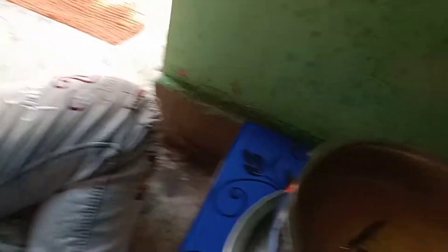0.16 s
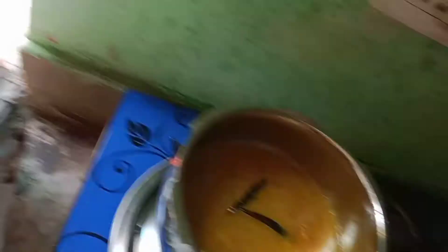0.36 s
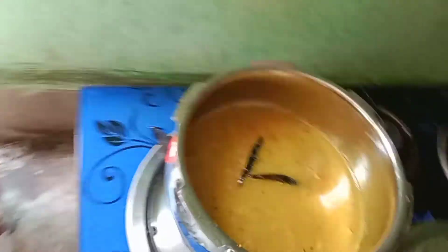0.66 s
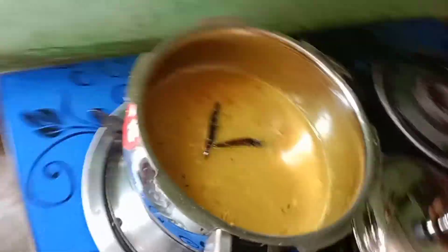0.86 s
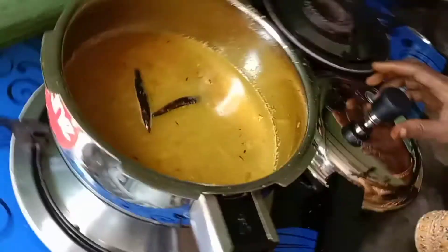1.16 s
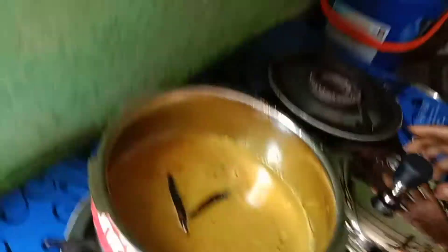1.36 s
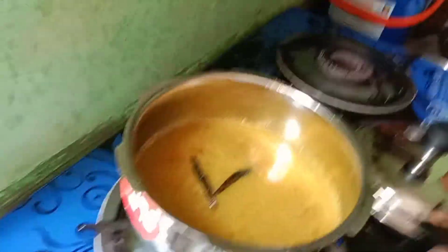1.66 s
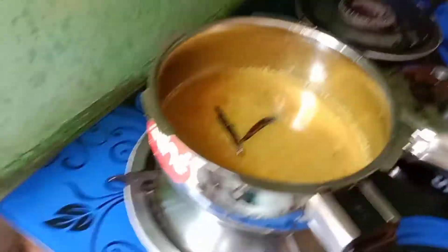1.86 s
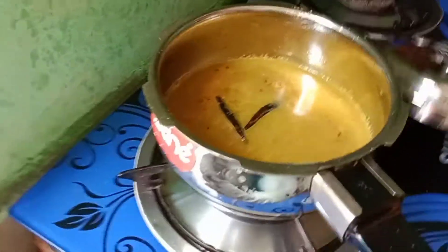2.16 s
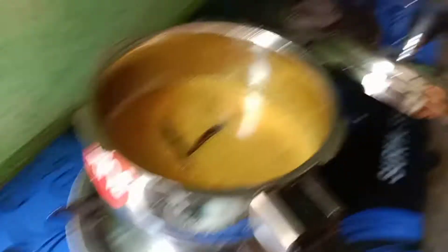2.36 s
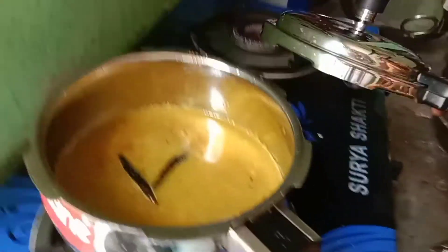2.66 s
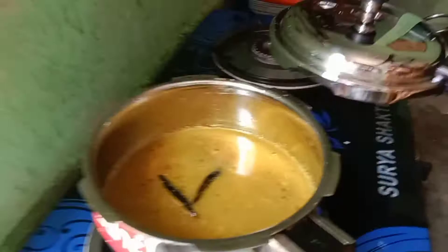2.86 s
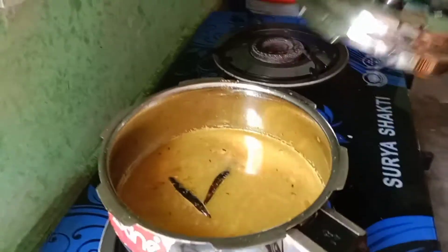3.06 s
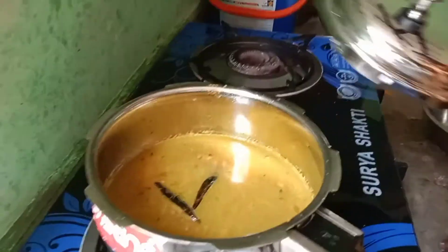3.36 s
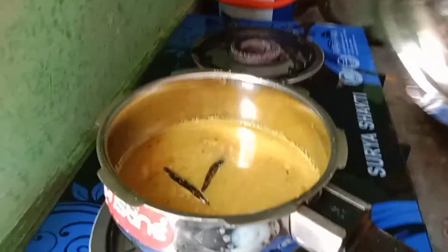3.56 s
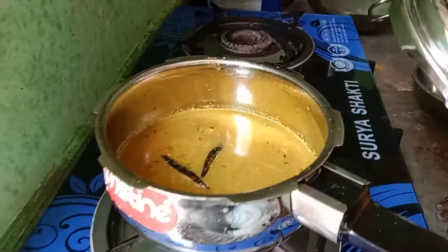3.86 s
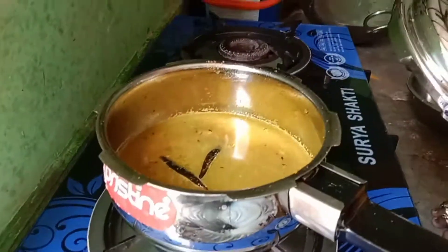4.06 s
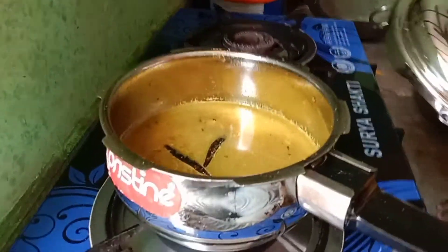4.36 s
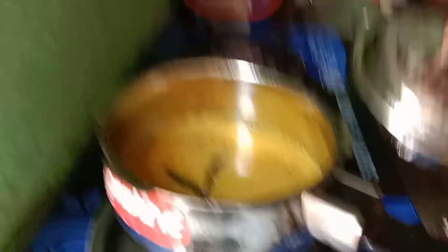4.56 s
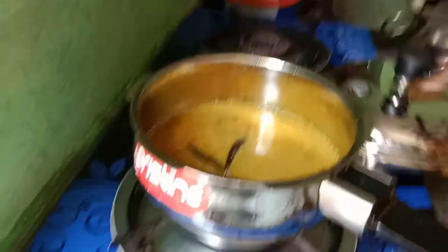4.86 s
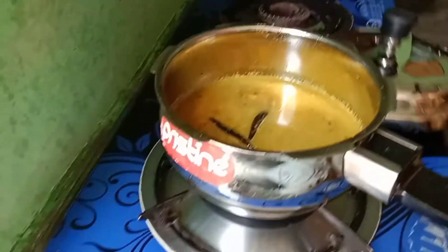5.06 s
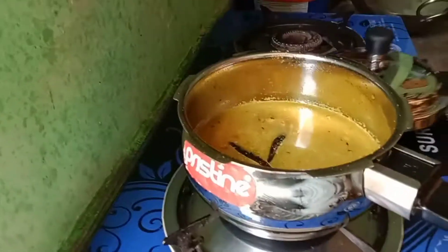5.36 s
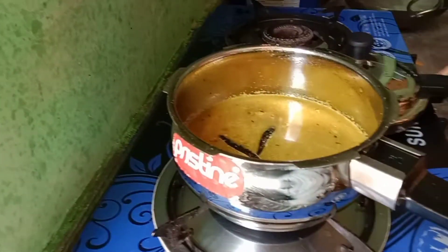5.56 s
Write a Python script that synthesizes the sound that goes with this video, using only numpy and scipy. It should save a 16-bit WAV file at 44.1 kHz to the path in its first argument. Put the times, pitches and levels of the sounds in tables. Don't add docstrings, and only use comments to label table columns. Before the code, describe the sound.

A metal cooker lid knocks, scrapes and clinks on a stove in a small kitchen while a vehicle horn buzzes briefly outside.

```python
import sys
import numpy as np
from scipy import signal
from scipy.io import wavfile
from scipy.ndimage import uniform_filter1d

SR = 44100
rng = np.random.default_rng(int(sys.argv[2]) if len(sys.argv) > 2 else 0)


def ratio_of_db(decibels):
    return 10 ** (np.asarray(decibels, float) / 20)


def generate_wav(signal):
    frames = np.transpose(np.atleast_2d(signal))
    scaled = np.clip(frames, -1, 1) * 32767
    pcm = np.round(scaled).astype(np.int16)
    wavfile.write(sys.argv[1], SR, pcm)


N = 251370
TIME = np.arange(N) / SR


def band(x, lo_hz, hi_hz, order=2):
    return signal.sosfilt(signal.butter(order, [lo_hz, hi_hz], "band", fs=SR, output="sos"), x)


def hush(lo_hz, hi_hz):
    x = band(rng.standard_normal(N), lo_hz, hi_hz)
    return x / x.std()


def walk(rate, size=N):
    hold = int(SR / rate)
    draws = rng.standard_normal(size // 400 + 2)[:size // hold + 1]
    steps = np.repeat(draws, hold)
    return 2.0 * uniform_filter1d(uniform_filter1d(steps, hold), hold)[:size]


def complex_walk(rate, other_rate, size=N):
    return walk(rate, size) + 1j * walk(other_rate, size)


def spikes(s, db):
    x = np.zeros(N)
    np.add.at(x, np.clip((np.asarray(s) * SR).astype(int), 0, N - 1), ratio_of_db(db))
    return x


def ring(x, hz, t60):
    r = np.exp(-np.log(1000) / (max(t60, .01) * SR))
    w = 2 * np.pi * hz / SR
    return signal.lfilter([0, r * np.sin(w)], [1, -2 * r * np.cos(w), r * r], x)


def fade(x, tau):
    return signal.lfilter([1], [1, -np.exp(-1 / (max(tau, 1e-4) * SR))], x)


# (time [s], level [dB])
STREET_RUMBLE = [(0, -36), (.28, -83), (.42, -60), (.6, -54), (1.25, -69.5), (1.55, -102), (1.98, -59),
                 (2.3, -41), (2.44, -68), (3.5, -62.5), (3.65, -45), (3.86, -65), (4.061, -51),
                 (4.7, -70.5), (4.81, -49), (4.98, -61), (5.25, -35), (5.45, -46)]
# (frequency [Hz], level [dB per Hz])
HISS_COLOUR = [(24, -36), (40, -6), (96, 2.5), (213, -25), (1080, -27.5), (2510, -29.5), (6010, -36),
               (8110, -22), (15500, -55.5)]


def street():
    s, deep_db = np.transpose(STREET_RUMBLE)
    mid_db = np.minimum(-46.5 + 0.57 * deep_db, -60)
    out = ratio_of_db(np.interp(TIME, s, deep_db) - 2.5 + 0.63 * walk(22)) * hush(72, 110)
    for lo_hz in (1170, 1450, 2190, 2460, 3040):
        out += ratio_of_db(np.interp(TIME, s, mid_db) - 7.0 + 3.5 * walk(13)) * hush(lo_hz, 1.15 * lo_hz)
    hz, db = np.transpose(HISS_COLOUR)
    for f in 200 * 2 ** np.arange(0, 6.2, .5):
        flicker_db = 2.5 * walk(16)
        hiss_db = np.interp(np.log(f), np.log(hz), db) + 10 * np.log10(f) - 92
        out += ratio_of_db(hiss_db + flicker_db) * hush(f / 1.1, f * 1.5)
    return out


# (time [s], length [s], frequency [Hz], level [dB])
FAR_SCRAPS = [(0, 0.19, 1700, -67.5), (0, 0.2, 4430, -74), (0, 0.7, 9744, -85.5), (0.908, 0.13, 1175, -71),
              (1.04, 0.068, 2770, -74), (1.684, 0.097, 249, -50.5), (3.009, 0.91, 417.5, -73),
              (3.753, 0.62, 426, -72), (3.362, 0.66, 133.6, -63), (4.107, 0.29, 1630, -78.5),
              (4.211, 0.14, 630, -73.5), (4.212, 0.031, 3760, -76), (4.399, 0.11, 198, -68),
              (5.202, 0.19, 129.8, -42), (3.64, .1, 420, -56), (3.885, .11, 110, -58), (2.6, .16, 520, -77),
              (3.48, .09, 2200, -70)]
# (time [s], length [s], start frequency [Hz], end frequency [Hz], level [dB])
LID_GULPS = [
    (0, .2, 300, 150, -54),
    (1.501, 0.081, 410, 560, -68.5),
    (3.665, 0.06, 760, 930, -46),
    (4.015, 0.07, 790, 880, -52),
    (3.735, 0.061, 770, 920, -66),
]


def scraps():
    out = np.zeros(N)
    steady = [(s, length, hz, hz, db) for s, length, hz, db in FAR_SCRAPS]
    for start, length, from_hz, to_hz, db in steady + LID_GULPS:
        first = int(max(start, 0) * SR)
        share = np.linspace(0, 1, int(length * SR))
        tone = np.exp(2j * np.pi * np.cumsum(from_hz + (to_hz - from_hz) * share) / SR)
        hurry = 3 if length < .25 and to_hz > 300 else 1
        wander = complex_walk(100, 100, size=SR)[::hurry][:len(share)]
        waver = (.3 if db < -25 else 2.5) + wander
        lean = 0.25 if from_hz >= to_hz else .9
        swell = np.sqrt(np.sin(np.pi * share ** lean).clip(0))
        out[first:first + len(share)] += ratio_of_db(db) * swell * (tone * waver).real
    return out


HORN_HZ = 335.85
# (time [s], level [dB])
HORN_LEVEL = [
    (.36, -74),
    (.405, -43),
    (.52, -31),
    (0.554, -41),
    (0.597, -28),
    (0.624, -41.5),
    (.69, -29),
    (.75, -37.5),
    (0.919, -63),
]
# (multiple of HORN_HZ [1], level [dB])
HORN_PARTIALS = [(1, -21), (2, -47), (3, -51), (4, -38), (5, -23), (6, -28), (7, -29), (8, 0), (9, -7),
                 (10, -20), (11, -38), (12, -33), (13, -34), (14, -49), (15, -52), (16, -32), (17, -42),
                 (18, -45), (19, -43), (20, -42), (21, -31), (22, -33), (23, -31), (24, -35), (25, -38),
                 (26, -31), (27, -38), (28, -34), (29, -38), (30, -42), (31, -41), (32, -45), (33, -47),
                 (35, -53)]
# (time [s], half width [s], depth [dB])
FUNDAMENTAL_DIP = (.628, 0.035, -36)
# (start time [s], fall [dB per s])
UPPER_FADE = (0.66, 63)
# (time [s], half width [s], level [dB])
RELEASE_RASP = (0.84, .05, 15)


def horn():
    def bump(time_s, half_width_s, db):
        return db * np.exp(-((t - time_s) / half_width_s) ** 2)

    s, main_db = np.transpose(HORN_LEVEL)
    t = TIME[:3 * SR // 2]
    lines = dict(HORN_PARTIALS)
    out = np.zeros(len(t))
    dying = np.clip(t - s[-1], 0, None)
    # start, then attack, hold and release lengths [s]
    corners_s = np.cumsum([0.3734, 0.056, 0.38, 0.13])
    blown = np.interp(t, corners_s, [-29, 0, 0, -26])
    blowing = blown + 9.9 - 300 * dying
    next_db = blown - 40.5
    fade_start_s, fall_db_per_s = UPPER_FADE
    high_db = blown - 63 - fall_db_per_s * np.clip(t - fade_start_s, 0, None)
    root_db = blown - 51.5 + bump(*FUNDAMENTAL_DIP)
    for k, db in lines.items():
        echo = 1.4 * complex_walk(55.24, 33.67, size=len(t))
        if k == 8:
            level, echo = np.interp(t, s, main_db) - 85 * dying, 0.89 * echo
        elif k in (9, 10):
            level, echo = next_db + db - lines[9] - 230 * dying, 0.67 * echo
        elif k > 10:
            level = high_db + db - lines[8] + 26 - 300 * dying
        elif k == 1:
            level, echo = root_db - 300 * dying, 0.35 * echo
        else:
            level = db - lines[8] - 48.0 + blowing
        size = uniform_filter1d(ratio_of_db(level), size=400) * (1 + echo)
        turns = k * HORN_HZ * t + rng.random()
        out += np.sqrt(2) * (size * np.exp(2j * np.pi * turns)).real
    rasp_db = next_db + bump(*RELEASE_RASP)
    buzz = ratio_of_db(blowing - 74) * hush(250, 4200)[:len(t)]
    buzz += ratio_of_db(rasp_db - 23 - 300 * dying) * hush(2550, 3700)[:len(t)]
    buzz += ratio_of_db(high_db - 10 - 300 * dying) * hush(7000, 9000)[:len(t)]
    return np.pad((out + buzz) * (t > s[0]), (0, N - len(t)))


# (time [s], peak level [dB], sharpness [dB])
WEIGHT_TICKS = [(0.1326, -54, -8), (0.645, -32, 5), (0.9193, -60, 4), (1.167, -43.5, -0.5), (1.192, -55, 4),
                (1.8617, -44.5, -1.5), (1.929, -32, -9), (2.183, -10.5, -1), (2.7711, -47, 9),
                (3.1484, -39.5, 0), (3.2947, -46, 3.5), (3.5655, -43, 9.5), (3.5915, -31.5, -1.5),
                (3.6135, -19.5, -1), (3.6223, -21.5, 0), (3.6267, -9, 3), (3.655, -11, 7.5),
                (3.6827, -23, 6.5), (3.6992, -17, 5.5), (3.7134, -32, -2), (3.7922, -33.5, -3.5),
                (4.0722, -41.5, -16.5), (4.1744, -43, 3), (4.442, -41, 12), (4.68, -60, 10),
                (4.716, -31, 0), (5.1617, -24.5, -8), (5.4551, -38.5, -4), (5.59, -33.5, 2)]
# (frequency [Hz], width [Hz], level [dB])
WEIGHT_MODES = [(4300, 60, -5), (4840, 38, -9), (7110, 73, -23), (7800, 47, -2), (8270, 44, 0),
                (8770, 44, -11), (9230, 40, -18), (12100, 58, -21), (12600, 75, -3), (12900, 60, -14),
                (13300, 110, -10), (13500, 31, -14), (13700, 43, -17), (14800, 54, -12)]
# (lowest frequency [Hz], highest frequency [Hz])
WEIGHT_CLUSTERS = [(3800, 6000), (7000, 10500), (11300, 15600)]


def weight():
    s, db, sharp = np.transpose(WEIGHT_TICKS)
    top_db, low_db = -4 + sharp, -7 - 1.4 * sharp
    luck_db = 4 * rng.standard_normal((len(s), len(WEIGHT_MODES)))
    late_s = 0.0039 * rng.random(luck_db.shape)
    out = np.zeros(N)
    for (lo_hz, hi_hz), colour_db in zip(WEIGHT_CLUSTERS, [low_db - 2, -5, top_db - 1.5]):
        part = ratio_of_db(-15.0) * hush(lo_hz, hi_hz) * fade(spikes(s, db + colour_db), 0.005)
        for m, (hz, width_hz, mode_db) in enumerate(WEIGHT_MODES):
            if lo_hz < hz < hi_hz:
                drive = spikes(s + late_s[:, m], db + colour_db + luck_db[:, m])
                part += ratio_of_db(1.2 * mode_db + 2) * ring(drive, hz, 1.4 / width_hz)
        out += band(part, lo_hz, hi_hz, order=3)
    return out


# (time [s], frequency [Hz], peak level [dB], t60 [s])
CLEAN_BELL = [
    (5.103, 1116, -17, .4),
]
# (time [s], frequency [Hz], peak level [dB], t60 [s])
SINGLE_MODES = [(0.641, 8840, -42.5, 0.28), (0.641, 9200, -49.5, 0.14), (1.933, 798, -22, 0.18),
                (1.935, 2500, -19, 0.046), (1.983, 790, -17, .13), (1.983, 1460, -16, 0.08),
                (1.985, 2210, -27, 0.097), (2.182, 2200, -13, 0.25), (2.1815, 2150, -6, .03),
                (2.29, 760, -27, .2), (1.933, 1500, -20, .07), (4.74, 1500, -17, .06),
                (2.183, 2590, -9.5, 0.14), (2.182, 1430, -5, 0.04), (2.295, 2200, -25, 0.16),
                (3.592, 4240, -43.5, .3), (3.592, 4850, -47, .2), (3.612, 4200, -31, 0.32),
                (3.68, 4850, -39, 0.36), (3.6289, 1410, -28.5, 0.023), (3.6289, 2350, -31.5, 0.017),
                (3.629, 4280, -33, 0.22), (3.657, 4410, -29, 0.14), (3.6605, 1637, -38.5, 0.28),
                (3.682, 2260, -34.5, 0.3), (3.682, 2686, -37.5, .5), (3.682, 3430, -41.5, 0.12),
                (3.871, 2221, -20, 0.32), (3.897, 2221, -19.5, 0.21), (3.897, 3470, -26, 0.077),
                (3.87, 880, -47.5, 0.19), (3.972, 3880, -23.5, 0.12), (4.052, 3880, -29.5, 0.17),
                (3.972, 2560, -22, 0.16), (3.972, 1748, -24, 0.11), (4.772, 3170, -14.5, 0.22),
                (4.772, 3950, -18, .15), (5.024, 494, -18.5, 0.43), (5.03, 2200, -27, 0.28),
                (5.09, 2700, -17, 0.059), (2.183, 1136, -11.5, .1), (5.316, 2200, -24, 0.2),
                (5.34, 495, -29, 0.294), (5.457, 4940, -20, 0.12), (5.458, 5220, -30, .25),
                (5.457, 2994, -13.5, 0.053), (5.46, 2205, -29, 0.4), (5.46, 486, -23.5, 0.37),
                (5.181, 263, -20, 0.056), (5.197, 480, -10.5, 0.018), (5.198, 1400, -16, 0.014),
               (5.198, 900, -13, 0.015), (5.201, 148, -20.5, 0.057), (5.278, 249, -21.5, .05),
               (5.287, 438, -14, 0.038), (5.291, 810, -14, 0.021), (5.302, 684, -13, 0.024),
               (5.304, 190, -13.5, 0.038), (5.325, 733, -22, 0.04), (5.483, 375, -17, 0.064),
               (5.198, 1850, -22, .012), (5.316, 1940, -16, .05), (5.588, 2100, -2, .03),
               (5.6, 651, -15, .3), (1.94, 250, -33, .3), (1.985, 265, -32, .3), (2.186, 250, -23, .3),
               (2.182, 720, -5, .04), (2.135, 765, -33, .15), (1.69, 1420, -40, .15),
               (1.691, 680, -39, .15), (1.693, 330, -41, .15), (1.933, 1100, -22, .07),
               (4.72, 1750, -19, .15), (3.603, 135, -42, .08), (3.626, 135, -33, .07),
               (3.65, 120, -36, .08), (3.683, 115, -38, .12),
                (4.717, 10300, -28, .05), (4.737, 10300, -26, .05), (4.757, 10300, -27, .04),
              (4.757, 6500, -26, .05), (4.757, 5050, -26, .06), (4.716, 9090, -25, .1),
              (4.772, 9090, -23, .1), (4.739, 9090, -25, .12), (4.716, 12600, -36, .12),
              (4.79, 5750, -32, .3), (0, 1720, -55, 1.3), (0, 2500, -61, 1.1), (0, 3500, -62, .9),
              (5.16, 14900, -40, .12), (5.16, 4600, -34, .12), (5.385, 8900, -50, .06),
              (4.679, 9000, -48, .08), (4.668, 2340, -62, .1), (4.72, 2240, -13, .15),
              (4.717, 3700, -12, .08), (4.739, 2140, -6, .04), (4.739, 3400, -11, .05),
              (4.752, 2200, -12, .08), (4.763, 3500, -14, .04), (4.773, 7900, -31, .08),
              (2.503, 3478, -19, .12), (2.503, 3946, -24, .05), (2.505, 5050, -32, .1),
              (3.023, 3176, -26, .05), (3.151, 2202, -25, .2), (3.151, 3140, -25, .09),
              (3.15, 5700, -33, .05), (2.925, 6500, -54, .015), (1.06, 2500, -56, .012),
              (2.128, 3050, -41, .12), (5.02, 2570, -17, .1)]


def pings():
    out, t = np.zeros(N + SR), TIME[:SR // 2]
    beating = 0.33 * complex_walk(104, 88)
    for k, (s, hz, db, t60) in enumerate(CLEAN_BELL + SINGLE_MODES):
        soft_start = -np.expm1(-t / min(.002, t60 / 30))
        stifled_db = 20 * (t / (.3 * t60)) ** 4
        size = soft_start * ratio_of_db(db - 60 * t / t60 - stifled_db)
        waver = np.roll(beating, -4000 * k)[:len(t)] * np.clip(t / .02, 0, 1)
        waver = waver * (k >= len(CLEAN_BELL))
        first = int(s * SR)
        out[first:first + len(t)] += size * ((1 + waver) * np.exp(2j * np.pi * hz * t)).imag
    return out[:N]


# (time [s], peak level [dB], favoured mode [Hz], passed to the stove [dB], hardness [dB])
STOVE_KNOCKS = [(0.0034, -39, 1630, 2, -10.5), (1.69, -31, 1410, -1, -13.5), (1.9312, -11, 770, -4, -20),
                (1.935, -15, 2500, -35, -26.5), (1.982, -12, 813, -6.5, -18.5), (2.1175, -34, 1390, 3, -29),
                (2.1396, -41.5, 762, -7, -24.5), (2.1816, 1.5, 700, -8, -20.5),
                (2.2966, -33, 762, -14, -14), (3.6287, -32, 1798, -7.5, -11.5),
                (3.682, -28, 2573, -6.5, -26.5), (5.017, -9, 500, -5, -19.5), (5.0904, -17, 1125, -16, -20),
                (5.1046, -25, 1125, 0, -22.5), (5.1966, -25.5, 1690, -14, -16.5),
                (5.3142, -7, 2205, -8, -26), (5.457, -16.5, 4780, -5.5, -9.5),
                (5.505, -28, 490, -7.5, -17.5), (5.5883, 2.5, 1950, -8.5, -17.5),
                (5.6124, -4.5, 1000, -4.5, -18)]
# (time [s], peak level [dB], favoured mode [Hz], thud of the hand [dB], hardness [dB])
HAND_CLINKS = [(2.5017, -15, 3470, -19, -13.5), (2.8182, -44, 3160, -29, -14.5),
               (3.022, -22, 3160, -20, -19), (3.15, -15, 2276, -23, -17), (3.7695, -22, 2220, -43, -33),
               (3.8708, -18, 2220, -32, -8.5), (3.8984, -16.5, 2340, -43, -19),
               (3.9094, -30.5, 2220, -35, -27.5), (3.965, -14.5, 2200, -55, -20),
               (3.9713, -11.5, 3470, -43, -41.5), (4.0343, -26.5, 2220, -25, -22),
               (4.0506, -20.5, 3910, -25.5, -29), (4.7002, -17.5, 2220, -43.5, -24),
               (4.715, -7, 2220, -44, -28), (4.7386, -2, 3160, -25, -18), (4.758, -17, 2220, -20.5, -6),
               (4.7725, -4, 3160, -50, -16.5)]


def blows():
    knocks = [row + (1,) for row in STOVE_KNOCKS]
    clinks = [row + (0,) for row in HAND_CLINKS]
    return np.transpose(sorted(knocks + clinks))


LIFT_S, LAND_S = 2.6, 5.0
# (lowest frequency [Hz], highest frequency [Hz])
LID_BANDS = [(60, 300), (300, 1700), (1400, 4500), (4500, 7400), (7400, 11300), (11300, 15600)]
# (time [s], length [s], start level [dB], end level [dB], speed as hiss [dB])
LID_SLIDES = [
    (2.006, 0.1, -41.5, -48, -9.5),
    (2.099, .075, -42.5, -42, -10.5),
    (2.238, .085, -35.5, -30.5, -16),
    (4.71, .075, -24, -17, -17),
    (4.771, 0.13, -20.5, -45.5, -17),
    (5.015, .17, -18, -30.5, -13.5),
    (5.193, 0.12, -34, -29, -3.5),
    (5.46, .125, -30, -39, -8),
    (5.6, .11, -21, -31, -11),
]


def slide_db():
    out = np.full((len(LID_BANDS), N), 1e-7)
    for start, length, from_db, to_db, hiss in LID_SLIDES:
        low = -23 if LIFT_S < start < LAND_S else -4
        nearest_end_s = np.minimum(TIME - start, start + length - TIME)
        edge = np.clip(nearest_end_s / 0.0075 + .5, 0, 1)
        size = edge * ratio_of_db(np.interp(TIME, [start, start + length], [from_db, to_db]))
        colour_db = np.array([low - 6, low, 0, 0.86 * hiss - 1.5, hiss, hiss - 8 + .4 * low])
        out += ratio_of_db(colour_db)[:, None] * size
    return 20 * np.log10(out)


def scrape():
    contacts = spikes(rng.random(6000) * N / SR, 4.0 * rng.exponential(size=6000))
    grit = fade(contacts, 0.0046)
    return ratio_of_db(slide_db()) * grit / np.sqrt(np.mean(grit ** 2))


def contact(s, blow_db, rub):
    crack_db = [-9.5, -7.0, -8.0, -4.0, -11, -4.0]
    rub_db = [-1.0, -2, -6.0, -2.0, -7, -1.5]
    parts = []
    for k, tau in enumerate([0.039, 0.0099, 0.0088, 0.0077, .004, 0.0056]):
        crack = ratio_of_db(crack_db[k]) * fade(spikes(s, blow_db[k]), tau)
        parts.append(hush(*LID_BANDS[k]) * (crack + ratio_of_db(rub_db[k]) * rub[k]))
    return parts


# (frequency [Hz], level [dB], t60 [s])
LID_MODES = [(1798, -11, 0.11), (2205, -6, 0.25), (2573, -13, 0.16), (2972, -24, 5.0), (3160, -15, 0.12),
             (3300, -21, 5.0), (3472, -7, 0.19), (3914, -17, 0.49), (4129, -13, 0.12), (5044, -21, 0.16),
             (5496, -34, 5.0), (5577, -34, 5.0), (5652, -26, 0.28), (6272, -28, 0.23), (6492, -27, 1.1),
             (7187, -29, 0.11), (7741, -15, 0.073), (7940, -22, 0.089), (8312, -36, 0.93),
             (9087, -22, 0.053), (9674, -44, 0.076), (10890, -35, 0.22)]
# (frequency [Hz], level [dB], t60 [s])
STOVE_MODES = [(500, -15, 0.21), (644, -5.5, 0.63), (746.9, -2.5, 0.28), (813, -8.5, 0.41), (909, -24, 5.0),
               (1125, -5.5, 0.61), (1310, -11, 5.0), (1410, -6, 0.57), (1455, -13, 5.0)]


def lid():
    s, mid, favourite_hz, low, hard, knock = blows()
    tilt_db = np.where(knock, 4, -2.5)
    upper, top = hard + tilt_db, hard - tilt_db
    in_hand = 1 - knock
    blow_db = [mid + low - 14 - 10 * in_hand, mid + low, mid,
               mid + upper, mid + top, mid + top - 8 - 11 * in_hand]
    rub = scrape()
    parts = contact(s, blow_db, rub)
    down = (TIME < LIFT_S) | (TIME > LAND_S)
    stove_damps_db = -4.5
    lower_group = band(parts[2], 1600, 2560, order=3)
    upper_group = ratio_of_db(stove_damps_db * down) * band(parts[2], 3150, 4400, order=3)
    parts[2] = lower_group + upper_group + (.06 + .4 * down) * parts[2]
    parts[2] += 1.0 * down * band(parts[2], 1500, 1600)
    parts[4] = band(parts[4], 7500, 9200, order=3) + .32 * parts[4]
    modes = LID_MODES + STOVE_MODES
    luck_db = 3.5 * rng.standard_normal((len(s), len(modes)))
    late_s = .004 * rng.random(luck_db.shape)
    ring_db = [-14, -14, -18.0, -4.5, 1.0, -5]
    for m, (hz, db, t60) in enumerate(modes):
        k = np.searchsorted([hi for _, hi in LID_BANDS], hz)
        favour_db = 9 * np.exp(-(np.log(hz / favourite_hz) / 0.02) ** 2)
        favour_db += stove_damps_db * knock * (3300 < hz < 4500)
        drive = spikes(s + late_s[:, m], blow_db[k] + luck_db[:, m] + favour_db)
        drive += ratio_of_db(-22.5) * rub[k] * rng.standard_normal(N)
        held_t60 = min(t60, .12 * min(1, 4000 / hz))
        parts[k] += ratio_of_db(.55 * db + ring_db[k]) * ring(drive, hz, held_t60)
    return sum(band(x, *edges, order=3) for x, edges in zip(parts, LID_BANDS))


# (frequency [Hz], t60 [s])
ROOM_DECAY = [(100, 0.55), (1000, 0.3), (4000, 0.26), (12000, 0.2)]


def room(x, wet_db):
    t = TIME[:SR // 2]
    hz, t60 = np.transpose(ROOM_DECAY)
    tail = np.zeros(len(t))
    for f in 85 * 2. ** np.arange(8):
        decay = ratio_of_db(-60 * t / np.interp(np.log(f), np.log(hz), t60))
        tail += band(rng.standard_normal(len(t)), f / 1.525, f * 1.18) * decay
    tail *= np.clip(t / 0.0072, 0, 1)
    return x + ratio_of_db(wet_db) * signal.fftconvolve(x, tail / np.sqrt(np.sum(tail ** 2)))[:N]


# (opening time [s], shutting time [s], level once shut [dB])
SUPPRESSOR_GATE = [(0, 0.027, -8.5), (.35, 0.905, 5.5), (1.151, 1.224, -12), (1.685, 1.758, -8.5),
                   (1.89, 2.325, -9), (2.494, 2.572, -11.5), (3.014, 3.052, -15.5), (3.14, 3.202, -14.5),
                   (3.294, 3.293, -12), (3.554, 3.71, -27), (3.773, 3.8, -18), (3.867, 4.057, -18),
                   (4.433, 4.414, -7.5), (4.675, 4.875, -10), (4.983, 5.392, -9), (5.431, 5.661, 2)]


def gate(fall=0.027):
    db = np.full(N, -12.)
    for opens, shuts, depth_db in SUPPRESSOR_GATE:
        after = TIME >= opens
        db[after] = depth_db * np.clip((TIME[after] - shuts) / fall, 0, 1)
    return db


# (time [s], level [dB])
TREBLE_GATE = [(5.325, 2), (5.337, -43), (5.452, -40), (5.454, -0.5), (5.462, -5.5), (5.48, -9.5),
               (5.585, -32), (5.587, -1), (5.6, -3), (5.64, -6.5), (5.7, -10)]


def shut_treble(x):
    treble = signal.sosfiltfilt(signal.butter(4, 8300, "high", fs=SR, output="sos"), x)
    return x - treble * (1 - ratio_of_db(np.interp(TIME, *np.transpose(TREBLE_GATE))))


def scene():
    kitchen = room(lid() + weight(), -5.0) + room(pings(), -14)
    kitchen = shut_treble(kitchen)
    return (kitchen * ratio_of_db(gate()) + horn() + street() + scraps())[None]


def roll_off(x):
    return signal.sosfilt(signal.butter(12, 15680, fs=SR, output="sos"), x)


def record(dry):
    hz, _, z = signal.stft(dry[0], SR, nperseg=1024)
    noise_db = np.interp(np.log(hz + 1), np.log([100, 1000, 4000, 15000]), [-100, -99, -100, -100])
    noise = ratio_of_db(noise_db) ** 2
    power = uniform_filter1d(np.abs(z) ** 2, size=2, axis=1) + 1e-20
    gain = np.clip(1 - noise[:, None] / power, .15, 1)
    x = signal.istft(z * gain, SR, nperseg=1024)[1][:N]
    x = signal.sosfilt(signal.ellip(8, .2, 60, 15650, fs=SR, output="sos"), x)
    return roll_off(np.clip(x, -1, 1)[None])


dry = scene()
out = record(dry)
generate_wav(out)
```